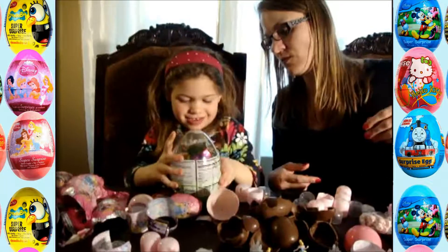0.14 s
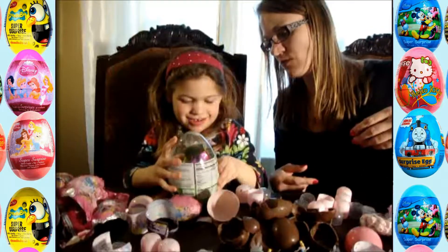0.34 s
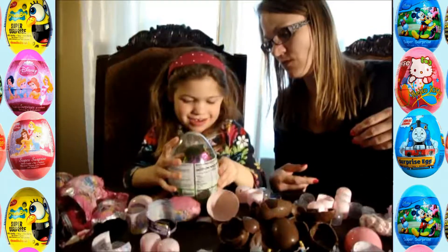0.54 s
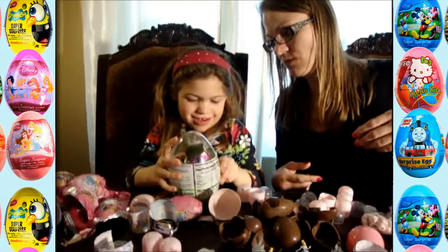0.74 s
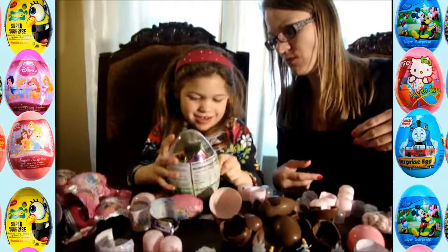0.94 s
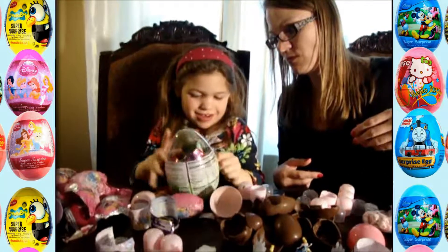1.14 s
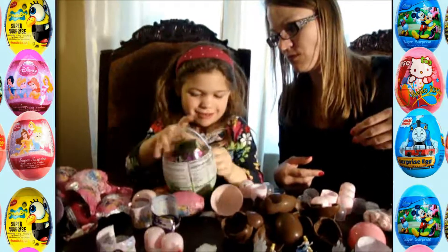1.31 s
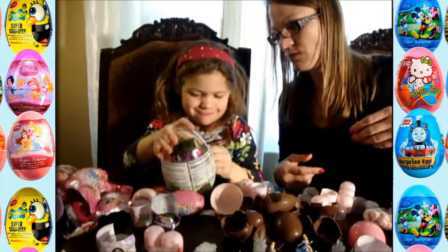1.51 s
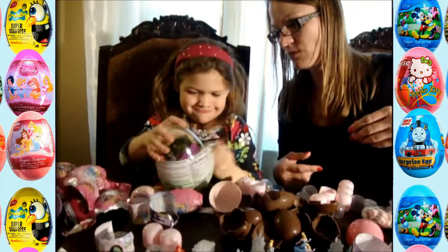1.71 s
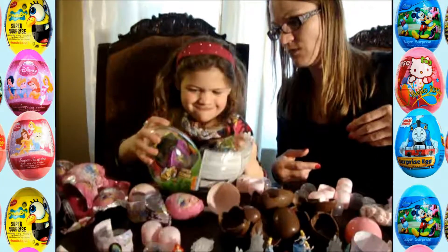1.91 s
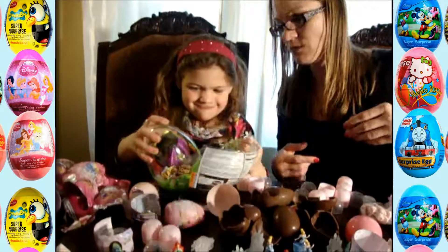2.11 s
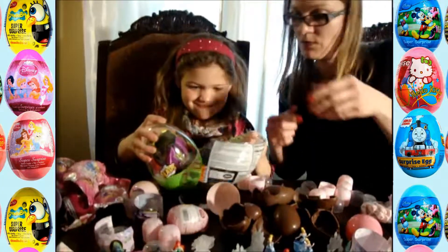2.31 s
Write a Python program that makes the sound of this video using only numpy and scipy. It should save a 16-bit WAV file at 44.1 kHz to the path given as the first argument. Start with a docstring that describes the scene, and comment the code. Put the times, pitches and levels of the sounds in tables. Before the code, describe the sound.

A taped hollow plastic egg is pried open by hand in a small room: scattered crackles and hollow knocks, one loud snap with a brief rattle, then short tape rips, heard close with faint hiss.

```python
"""In a small room, at a table, a large hollow plastic egg is pulled open by hand.
Cracks and short rips of the seam tape are noise bursts and stick-slip impulses filtered by the thin wall.
Knocks are damped modes of the hollow shell; midway the rim snaps free, rings and rattles.
Fingers rub (coloured impulses) and the egg thumps in the hands (dull noise bursts).
Faint hiss and a fading hum lie beneath; the egg's sounds pass through early echoes and a diffuse tail."""
import sys
import numpy as np
from scipy import signal
from scipy.fft import rfft, irfft, next_fast_len
from scipy.io import wavfile
from scipy.ndimage import map_coordinates

SR = 44100
rng = np.random.default_rng(int(sys.argv[2]) if len(sys.argv) > 2 else 0)


def dump(signal):
    """Clip the signal to [-1, 1] and save it as 16-bit WAV at the path in sys.argv[1]."""
    limited = np.clip(np.atleast_2d(signal).T, -1, 1)
    pcm = np.round(limited * 32767).astype(np.int16)
    wavfile.write(sys.argv[1], SR, pcm)


N = 103635  # samples in the scene
SIZE = 2048  # samples in one short sound
T = np.arange(SIZE) / SR
TIME = np.arange(N) / SR


def amp(db):
    """Level law: decibels to amplitude gain."""
    return 10 ** (np.asarray(db) / 20)


def unit(x):
    """Mean-square normalisation: scale to rms 1."""
    return x / np.sqrt(np.mean(x ** 2) + 1e-20)


def blow(x):
    """Energy normalisation: give a short sound the energy of 4 ms at rms 1."""
    return x * np.sqrt(.004 * SR / np.sum(x ** 2))


def along(points, hz):
    """Logarithmic pitch scale: interpolate (pitch_hz, value) points over log frequency."""
    point_hz, values = np.transpose(points)
    return np.interp(np.log(hz + 1), np.log(point_hz + 1), values)


def coloured(x, db_of_hz):
    """Minimum-phase filtering: a causal response with the given gain in dB, by folding its cepstrum."""
    m = 2 * next_fast_len(len(x) // 2 + SIZE)
    log_gain = np.log(amp(db_of_hz(np.fft.rfftfreq(m, 1 / SR))))
    cepstrum = irfft(log_gain, m)
    cepstrum[1:m // 2] *= 2
    cepstrum[m // 2 + 1:] = 0
    response = np.exp(rfft(cepstrum))
    return irfft(rfft(x, m) * response, m)[:len(x)]


def add(track, s, x):
    """Superposition: mix x into the track at time s, cut at the track's end."""
    part = track[round(s * SR):][:len(x)]
    part += x[:len(part)]


def level(points):
    """Amplitude envelope: gain per sample from (time_s, level_db) points, at -120 dB outside them."""
    return amp(np.interp(TIME, *np.transpose(points), left=-120, right=-120))


def burst(hold_s, t60_s):
    """Exponential decay: a run of tiny fractures, as noise, holds and then dies away."""
    return rng.standard_normal(SIZE) * amp(-60 * np.maximum(T - hold_s, 0) / t60_s)


def grains(rate, spread_db):
    """Random point process: impulses of either sign and uneven size, at a mean rate per second."""
    struck = rng.random(N) < rate / SR
    sign = np.sign(rng.normal(size=N))
    size = amp(spread_db * np.clip(rng.normal(size=N), -2, 2))
    return struck * sign * size


# Decay of the diffuse tail: pitch_hz [Hz], t60_s [s]
TAIL_T60 = [(200, 0.39), (600, 0.33), (3600, 0.35), (10000, 0.38)]
# Spectrum of the diffuse tail: pitch_hz [Hz], level_db [dB, relative]
TAIL_COLOUR = [(30, -23.5), (200, 1.5), (900, 9), (3300, 8.5), (6000, -3.5), (10000, -0.5)]
# Early echoes, nominal: delay_s [s], level_db [dB re direct, before wet_db]
EARLY_ECHOES = [(.0066, -16), (0.0173, -33.5)]
TAIL_DB, TAIL_BUILD_S = -9, 0.0015  # tail level re direct before wet_db; build-up time constant


def in_room(x, wet_db=0):
    """Room response: direct sound, early echoes and a diffuse tail, drawn afresh for each call."""
    hz, t, noise = signal.stft(rng.standard_normal(SR // 2), SR, nperseg=256)
    tail_db = along(TAIL_COLOUR, hz)[:, None] - 60 * t / along(TAIL_T60, hz)[:, None]
    tail = signal.istft(noise * amp(tail_db), SR, nperseg=256)[1]
    tail = tail * (1 - np.exp(-np.arange(len(tail)) / SR / TAIL_BUILD_S))
    answer = amp(TAIL_DB + wet_db) * tail / np.linalg.norm(tail)
    answer[0] += 1  # direct sound
    for delay_s, db in EARLY_ECHOES:
        add(answer, delay_s * rng.uniform(0.83, 1.08), amp([db + wet_db]))
    return signal.fftconvolve(x, answer)


RING_FLOOR_HZ = 234  # rings carry little below this


def ring(modes, scatter_db, ratio=1):
    """Modal superposition: damped sines, which each blow excites a little differently."""
    motion = np.zeros(SIZE)
    for k, (hz, db, t60) in enumerate(modes):
        decay = amp(db + scatter_db * rng.normal() - 60 * T / t60)
        mode_hz = ratio * hz * (1 + 0.024 * rng.normal())
        motion += (-1) ** k * decay * np.sin(2 * np.pi * mode_hz * T)
    return blow(signal.lfilter(*signal.butter(2, RING_FLOOR_HZ, "high", fs=SR), motion))


# Modes of the hollow shell, nominal: pitch_hz [Hz], level_db [dB, relative], t60_s [s]
SHELL_MODES = [(251, -23, 0.028), (448, -6.5, 0.02), (584, -4, 0.033), (758, -2, 0.023), (900, -1.5, 0.036),
               (997, 0.5, 0.017), (1218, 2.5, 0.018), (1363, -4, 0.034)]
# The shell rings higher as its halves part: time_s [s], pitch_ratio [1]
OPENING_PITCH = [(1.65, 0.991), (2.0, 1.403)]


def shell(s):
    """Modal tuning: one knock on the hollow egg, its pitch set by how far it is open at time s."""
    return ring(SHELL_MODES, scatter_db=2.5, ratio=np.interp(s, *np.transpose(OPENING_PITCH)))


# Fracture spectrum through the wall: pitch_hz [Hz], level_db [dB, relative]
FRACTURE_COLOUR = [(300, -31), (700, -12.5), (1200, -4.5), (1600, -5.5), (2400, 1.5), (3500, 0.5),
                   (5000, 3), (7000, 0.5), (10000, -8.5)]
# How brightness tilts that spectrum: pitch_hz [Hz], share [dB per dB of brightness]
BRIGHTNESS_SHARE = [(2000, -0.53), (4000, -0.36), (6500, 0.35), (10000, 0.93)]
# Bending resonances of the wall: pitch_hz [Hz], width_hz [Hz], boost_db [dB]
WALL_BENDING = [(2430, 130, 0.5), (3000, 310, 0.5), (3607, 170, 5.5), (4730, 130, 4.5), (5400, 340, 2)]
PATCH_OCTAVES = 0.21  # half-width of the emphasis from one patch of plastic


def plastic(x, bright_db, patch_db=0, place=0):
    """Plate radiation: the thin wall colours fractures; place (0-1) sets the pitch its patch favours."""
    patch_hz = 2200 * 2 ** (1.844 * place)

    def wall_db(hz):
        tilt = along(FRACTURE_COLOUR, hz) + bright_db * along(BRIGHTNESS_SHARE, hz)
        patch = patch_db / (1 + (np.log2((hz + 1) / patch_hz) / PATCH_OCTAVES) ** 2)
        bending = sum(db / (1 + (2 * (hz - c) / w) ** 2) for c, w, db in WALL_BENDING)
        return tilt + patch + bending

    return coloured(x, wall_db)


# Hiss spectrum: pitch_hz [Hz], level_db [dB, relative]
HISS_COLOUR = [(25, -1), (100, 5), (450, 15), (1200, 5.5), (10000, -3.5)]
# Hum tones: pitch_hz [Hz], level_db [dB re the hum envelope]
HUM_TONES = [(107.7, -0.5), (161.5, -4)]
# Hum envelope, which fades: time_s [s], level_db [dB]
HUM_FADE = [(.40, -64.5), (1.5, -70), (1.9, -75)]


def background():
    """Stationary noise and pure tones: steady hiss over a low hum that fades."""
    hum = np.zeros(N)
    for hz, db in HUM_TONES:
        hum += amp(db) * np.sqrt(2) * np.sin(2 * np.pi * (hz * TIME + rng.random()))
    hiss = unit(coloured(rng.standard_normal(N), lambda hz: along(HISS_COLOUR, hz)))
    return amp(np.interp(TIME, *np.transpose(HUM_FADE))) * hum + amp(-62) * hiss


# Fingers on plastic: time_s [s], level_db [dB, before RUB_DB]
RUB_LEVEL = [(0, -33), (.06, -35.5), (.09, -36.5), (.14, -43.5), (.38, -54), (.43, -51), (.6, -60),
             (.95, -38.5), (1.12, -61), (1.22, -67), (1.44, -38.5), (1.9, -61), (2.12, -46.5),
             (2.35, -52.5)]
# Spectrum of the rubbing: pitch_hz [Hz], level_db [dB, relative]
RUB_SPECTRUM = [(25, -36), (70, -7.5), (140, -10), (250, 0), (420, -1.5), (850, 4.5), (1200, 2), (1500, -3),
                (2200, -1), (2900, 2.5), (4200, -6.5), (6300, -2.5), (10000, -13.5)]
# Low rumble of the grip: time_s [s], level_db [dB]
GRIP_RUMBLE = [(0, -59), (.45, -57.5), (.62, -61.5), (1.7, -76), (2.0, -89)]
RUB_DB = -9.5


def fingers():
    """Sliding friction: many small contacts as fingertips slide, and a rumble as they shift their grip."""
    rub = unit(coloured(grains(rate=1500, spread_db=3.0), lambda hz: along(RUB_SPECTRUM, hz)))
    rumble_colour = [(30, -20.0), (70, 1), (110, -3.5), (260, 5.5), (600, -19.5)]  # pitch_hz, level_db
    rumble = unit(coloured(rng.standard_normal(N), lambda hz: along(rumble_colour, hz)))
    return in_room(amp(RUB_DB) * level(RUB_LEVEL) * rub)[:N] + level(GRIP_RUMBLE) * rumble


# Dull thumps of the egg in the hands: start_s [s], level_db [dB]
THUMP_EVENTS = [(0.444, -31), (.468, -33.5), (0.764, -43), (0.875, -47), (1.3155, -35.5), (1.511, -52),
                (1.589, -43.5), (1.689, -39.5)]
# Spectrum of a thump: pitch_hz [Hz], level_db [dB, relative]
THUMP_SPECTRUM = [(25, -12.5), (100, -13), (250, 3), (450, -3), (1500, -18)]


def thumps():
    """Impulsive excitation: the egg jerks in the hands, a short low-pitched noise burst."""
    out = np.zeros(N)
    for s, db in THUMP_EVENTS:
        jerk = burst(hold_s=0.0021, t60_s=0.023)
        thump = blow(coloured(jerk, lambda hz: along(THUMP_SPECTRUM, hz)))
        add(out, s, in_room(amp(db) * thump))
    return out


# Hollow knocks of the curved wall: start_s [s], level_db [dB], pitch_hz [Hz, centre of the emphasis]
KNOCK_EVENTS = [(.214, -33.5, 820), (.2795, -32.5, 850), (.409, -38, 845), (.449, -27.5, 817),
                (.471, -26, 980), (.645, -26, 793), (.673, -27.5, 670), (.7125, -26, 820), (.719, -26, 820),
                (.734, -31, 1250), (.7595, -25.5, 720), (.776, -29, 800), (.8145, -24, 585),
                (.8295, -26, 870), (.877, -39, 430), (.994, -25.5, 860), (1.007, -26.5, 642),
                (1.0315, -32.5, 1230), (1.112, -36, 1280), (1.156, -35.5, 624), (1.364, -32, 920),
                (1.759, -25.5, 1096), (1.987, -32.5, 990)]
KNOCK_OCTAVES, KNOCK_EMPHASIS_DB = 0.4, 14  # half-width and height of the emphasis on nearby modes


def knocks():
    """Selective modal excitation: the wall buckles, and where it gives decides which modes ring most."""
    out = np.zeros(N)
    for s, db, pitch_hz in KNOCK_EVENTS:
        modes = []
        for hz, mode_db, t60 in SHELL_MODES:
            octaves = np.log2(hz / pitch_hz)
            emphasis_db = KNOCK_EMPHASIS_DB / (1 + (octaves / KNOCK_OCTAVES) ** 2)
            modes.append((hz, mode_db + emphasis_db, t60))
        add(out, s, in_room(amp(db) * ring(modes, scatter_db=1.5)))
    return out


def rim_edge():
    """Contact impact: the sharp edge of one contact of the rim."""
    return amp(-5) * blow(plastic(burst(hold_s=0.00023, t60_s=0.019), bright_db=-2))


# Modes of the rim, nominal: pitch_hz [Hz], level_db [dB, relative], t60_s [s]
RIM_MODES = [(2070, -6, 0.0083), (2940, -2, 0.009), (3550, 3, 0.0045), (4060, -2.5, 0.011),
             (4650, -2.5, .007), (6160, -1, 0.0067)]
# Snaps of the rim and their strong early echoes: start_s [s], level_db [dB], thud_db [dB re the snap]
SNAP_EVENTS = [(1.2322, -30.5, -8), (1.2742, -29.5, -6), (1.2851, -23, -29), (1.303, -58, -16),
               (1.3156, -12.5, -19), (1.322, -22, -29)]
RIM_SCATTER_DB = 0.5


def snaps():
    """Sudden release: each snap or strong echo is a brief ring of the rim, a sharp edge and a shell thud."""
    out = np.zeros(N)
    for s, db, thud_db in SNAP_EVENTS:
        snap = ring(RIM_MODES, RIM_SCATTER_DB) + rim_edge() + amp(thud_db) * shell(s)
        add(out, s, in_room(amp(db) * snap, wet_db=-2))
    return out


GRAINS_PER_S, GRAIN_SPREAD_DB = 3200, 4  # small contacts of rattle and rips
RATTLE_S, RATTLE_DB = 1.322, -20  # start; level before rise and decay
RATTLE_RISE_S, RATTLE_T60_S = .007, 0.17  # rise time constant; 60 dB decay time


def rattle():
    """Repeated impact: the freed rim chatters in dense small contacts, scrapes the wall, rings and dies away."""
    age = np.maximum(TIME - RATTLE_S, 0)
    contacts = grains(GRAINS_PER_S, GRAIN_SPREAD_DB)
    ringing = unit(signal.fftconvolve(contacts, ring(RIM_MODES, RIM_SCATTER_DB))[:N])
    scrape = unit(plastic(grains(GRAINS_PER_S, GRAIN_SPREAD_DB), bright_db=-5))
    chatter = unit(scrape + ringing)
    envelope = (1 - np.exp(-age / RATTLE_RISE_S)) * amp(RATTLE_DB - 60 * age / RATTLE_T60_S)
    return in_room(chatter * envelope, wet_db=2.5)[:N]


STICK_HZ, STICK_DB = 220, 6  # rate of random catch-and-give steps; greatest change either way


def slips(rate):
    """Stick-slip: the glue catches and gives, in uneven clumps of grains of limited swing."""
    stick = np.tanh(map_coordinates(rng.standard_normal(SIZE), [np.arange(N) * STICK_HZ / SR]))
    return grains(rate, GRAIN_SPREAD_DB) * amp(STICK_DB * stick)


# Peeling tape, one envelope per rip: time_s [s], level_db [dB, before RIP_DB]
RIP_ENVELOPES = [
    [(.443, -25.5), (.466, -24), (.472, -16), (.477, -30.5), (.495, -26.5), (.51, -50)],
    [(.636, -56), (.685, -35), (.72, -32), (.78, -33), (.84, -35), (.93, -40.5)],
    [(1.47, -55), (1.485, -31), (1.505, -52), (1.53, -24.5), (1.555, -65), (1.58, -37), (1.596, -24),
     (1.625, -29.5), (1.652, -30), (1.66, -52)],
    [(1.686, -32), (1.692, -21.5), (1.748, -23), (1.762, -19.5), (1.785, -27), (1.81, -31), (1.83, -62),
     (1.848, -25), (1.875, -61)],
    [(1.97, -38), (1.99, -22), (2.01, -56), (2.024, -22.5), (2.06, -54)],
]
# One row per rip: brightness_db [dB], shell_knock_db [dB, added to RIP_KNOCK_DB]
RIP_TONES = [(-3.5, 3.5), (-2, 5), (-1, -3.5), (-0.5, -0.5), (-10, -0.5)]
RIP_DB, RIP_KNOCK_DB, RIP_PATCH_DB = -1, -12, 6.5  # overall; shell re tear; patch emphasis


def rips(count=6):
    """Incoherent summation: strands of tape slip independently, each on its own patch, and shake the shell."""
    out = np.zeros(N)
    for points, (bright_db, knock_db) in zip(RIP_ENVELOPES, RIP_TONES):
        strands = [slips(GRAINS_PER_S / count) for _ in range(count)]
        tear = np.zeros(N)
        for k, strand in enumerate(strands):
            place = (k + rng.random()) / count
            tear += unit(plastic(strand, bright_db, RIP_PATCH_DB, place))
        mean_s = np.mean(points, axis=0)[0]
        body = unit(signal.fftconvolve(sum(strands), shell(mean_s))[:N])
        out += level(points) * (unit(tear) + amp(RIP_KNOCK_DB + knock_db) * body)
    return in_room(amp(RIP_DB) * out)[:N]


# Cracks of tape and seam: start_s [s], level_db [dB, before CRACK_DB], brightness_db [dB]
CRACK_EVENTS = [(0.1144, -36, -10), (0.1301, -37, 1.5), (0.172, -30, -24), (0.1783, -35, -10),
                (0.1889, -34.5, -39), (0.213, -22, 2), (0.2646, -31, -15), (0.2792, -26.5, -30),
                (0.2875, -30.5, -1.5), (0.293, -31.5, 3), (0.321, -29, -1), (0.3367, -22, 3.5),
                (0.344, -35, 16), (0.434, -30.5, -2), (0.445, -21, 6), (0.449, -18, -2.5), (0.4526, -19, 8),
                (0.461, -20, 1), (0.4684, -18.5, -5.5), (0.4714, -15.5, 11), (0.6394, -25.5, 1),
                (0.6441, -19, -2), (0.6595, -42, -2), (0.6712, -19.5, -3), (0.6773, -21, -0.5),
                (0.6854, -27, -7), (0.7106, -23.5, 4), (0.7152, -20, -4), (0.7205, -25.5, -2),
                (0.7335, -23, -6), (0.7495, -26, -10), (0.7590, -18, 2), (0.7628, -22.5, 1),
                (0.7741, -22.5, 1), (0.7916, -19.5, 3), (0.8136, -19, 0.5), (0.8287, -28, -3.5),
                (0.8384, -24.5, 4), (0.8439, -25.5, -8), (0.8743, -22, 10), (0.8814, -22.5, -9),
                (0.8951, -27, -18), (0.9631, -27.5, -0.5), (0.968, -31, 10), (0.9933, -21, -3.5),
                (1.0061, -19, 4), (1.013, -20, -2.5), (1.0204, -15.5, -5.5), (1.0314, -22.5, 5),
                (1.1111, -35, -6), (1.1554, -32, 2), (1.2046, -38, 1.5), (1.4618, -29, -8),
                (1.468, -32.5, -21), (1.4808, -22, 4), (1.5001, -30, 1), (1.5106, -25.5, -7.5),
                (1.5193, -20, 3.5), (1.5261, -24, -7), (1.57, -24, -7), (1.5885, -18.5, 12),
                (1.5962, -24.5, -0.5), (1.622, -28, -4), (1.6348, -23, 4.5), (1.663, -26, -1),
                (1.6889, -15, 8.5), (1.6974, -19, 11), (1.7062, -20, 4), (1.7257, -21, 5), (1.73, -18, 6.5),
                (1.7585, -20, -7.5), (1.795, -18.5, 6.5), (1.8078, -23.5, 3), (1.934, -23.5, 5.5),
                (1.9379, -27, 6.5), (1.9634, -32, 3), (1.9742, -21, 6.5), (1.9862, -20, -1),
                (1.9983, -27, -25), (2.0192, -18, -4), (2.0239, -23, -6), (2.0296, -21, 2),
                (2.2499, -36, 12)]
CRACK_DB, CRACK_KNOCK_DB, CRACK_PATCH_DB = 0.5, -16.5, 5.5  # overall; shell re crack; patch emphasis
CRACK_RISE_S, CRACK_HOLD_S, CRACK_T60_S = 0.00037, 0.0025, .009  # rise time constant, hold, decay


def cracks():
    """Fracture: the tape lets go a little at a time, and each crack also shakes the hollow shell."""
    out = np.zeros(N)
    for s, db, bright_db in CRACK_EVENTS:
        fracture = burst(CRACK_HOLD_S, CRACK_T60_S) * (1 - np.exp(-T / CRACK_RISE_S))
        crack = blow(plastic(fracture, bright_db, CRACK_PATCH_DB, place=rng.random()))
        both = crack + amp(CRACK_KNOCK_DB) * shell(s)
        add(out, s, in_room(amp(db + CRACK_DB) * both))
    return out


def scene():
    """Linear superposition: all sources summed at one microphone."""
    return (cracks() + knocks() + snaps() + rattle() + thumps() + rips() + fingers() + background())[None]


CLIP_TOP, TOP_HZ = .95, 10020  # amplitude that peaks approach; band limit


def record(dry):
    """Saturation and band limiting: the recorder rounds off high peaks and cuts steeply above its limit."""
    soft = dry / (1 + (dry / CLIP_TOP) ** 4) ** .25
    m = next_fast_len(N + SIZE)
    hz = np.fft.rfftfreq(m, 1 / SR)
    return irfft(rfft(soft, m) / np.sqrt(1 + (hz / TOP_HZ) ** 190), m)[:, :N]


dry = scene()
out = record(dry)
dump(out)
```